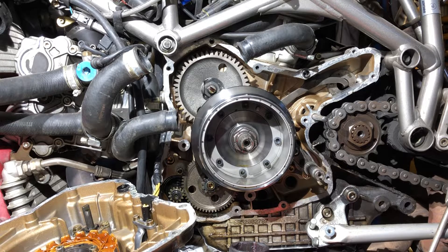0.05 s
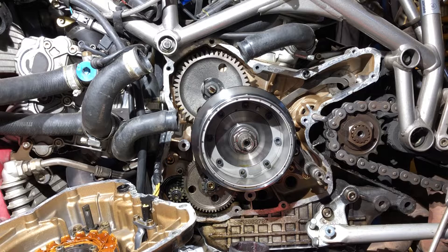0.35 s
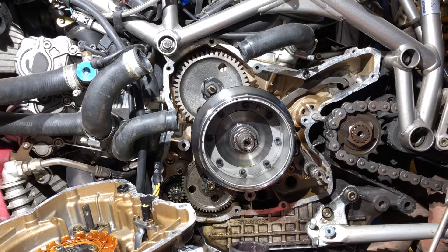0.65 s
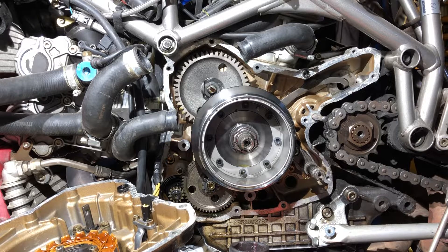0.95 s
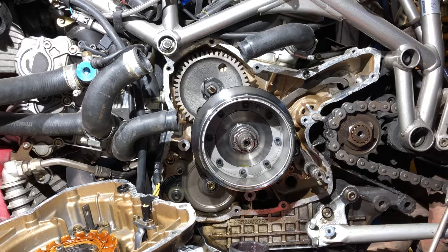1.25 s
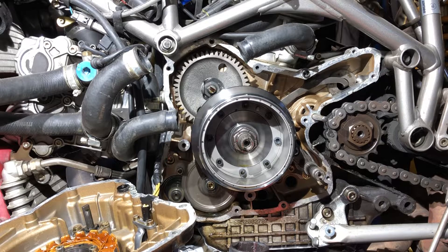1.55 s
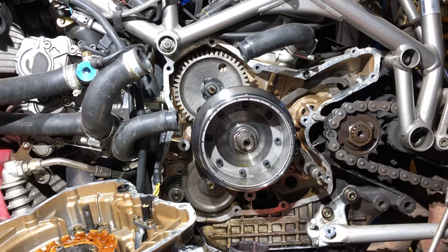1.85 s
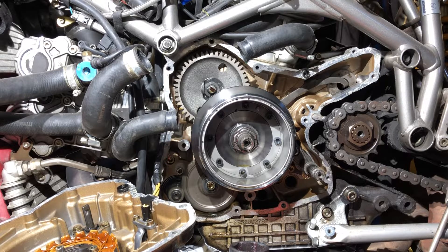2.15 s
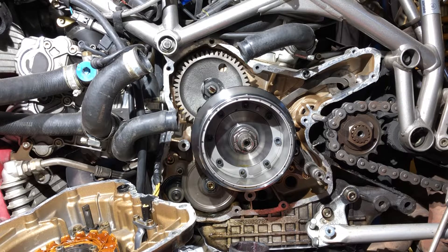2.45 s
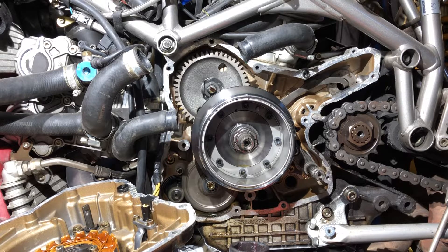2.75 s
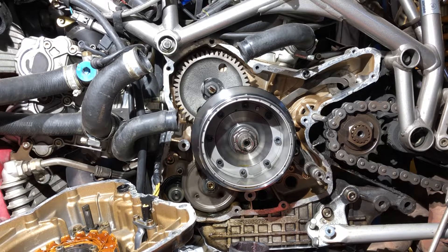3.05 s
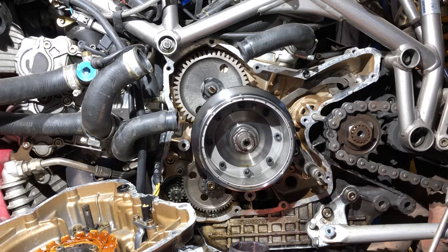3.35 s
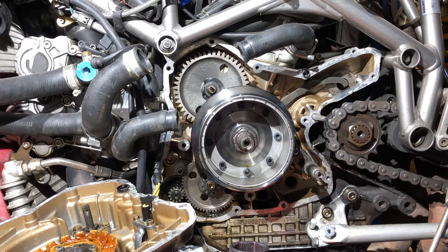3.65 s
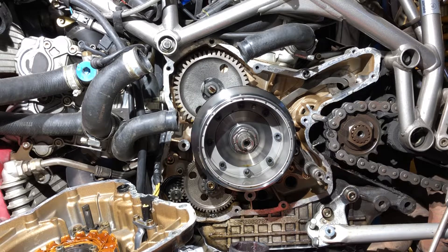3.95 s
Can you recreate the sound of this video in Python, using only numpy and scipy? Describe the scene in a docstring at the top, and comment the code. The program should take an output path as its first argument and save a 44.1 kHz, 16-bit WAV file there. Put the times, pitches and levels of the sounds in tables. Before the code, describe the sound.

A motorcycle starter motor kicks in with a clack, whirrs with grinding, rattling gears for a second, then coasts down and stops with a sharp metallic clunk. It is heard close up in a quiet workshop with a faint fan hum.

```python
"""A quiet workshop, a fan humming; mono. The starter motor of an opened motorcycle engine kicks in
with a clack, spins its reduction gears for a second and coasts down. Loose teeth rattle once a turn
and ring the steel wheels, the brushes hiss, the commutator whines. The train stops with a sharp
clunk that jolts the frame."""
import sys
import numpy as np
from scipy import signal
from scipy.fft import rfft, irfft, next_fast_len
from scipy.io import wavfile
from scipy.ndimage import uniform_filter1d, map_coordinates

SR = 44100
rng = np.random.default_rng(int(sys.argv[2]) if len(sys.argv) > 2 else 0)


def store_wav(level_fs):
    """Save 16-bit WAV to argv[1]."""
    pcm = np.round(np.clip(np.atleast_2d(level_fs), -1, 1) * 32767)
    wavfile.write(sys.argv[1], SR, pcm.T.astype(np.int16))


N = 176400
TIME_S = np.arange(N) / SR
HIT_TIME_S = np.arange(SR * 2 // 3) / SR
ON_S, STOP_S, FULL_SPEED_HZ = .98, 3.08, 139.3

# gear modes: pitch_hz, grinding_db, struck_db, t60_s
WHEEL_MODES = [(4339, 0, -4, .31), (4369, -5, 1, .14)]  # big wheel
IDLER_MODES = [(2585, -2, -11, .36), (2608, 0, -7, .14)]  # smaller gear
HIGH_MODES = [(3610, -7, -16, .2), (3745, -8, -18, .15), (6605, -14, -5, .32), (6675, -2, -4, .14),
              (6791, 0, -11, .2), (6980, 0, -16, .2), (11615, -3, -12, .12), (11693, 1, -16, .12)]  # upper modes of the steel gears
# tooth knock spectrum: freq_hz, gain_db
KNOCK_SPECTRUM = [(30, -67.5), (400, -14.5), (720, -14), (1050, -11), (1230, -1.5), (1520, -1), (1700, -7),
                  (2100, -26), (2700, -10.5), (5500, -45.5), (12000, -24)]


def amp(db):
    """Decibels to gain."""
    return 10 ** (np.asarray(db) / 20)


def unit(x):
    """Scale to rms 1."""
    return x / np.sqrt(np.mean(x ** 2) + 1e-20)


def along(points, hz):
    """Interpolate (freq_hz, value) points on a log frequency axis."""
    freq_hz, values = np.transpose(points)
    return np.interp(np.log(hz + 1), np.log(freq_hz + 1), values)


def curves(rows):
    """One value per sample for each column after the time."""
    time_s, *columns = np.transpose(rows)
    return [np.interp(TIME_S, time_s, column) for column in columns]


def wobble(rate_hz):
    """Smooth random curve with knots at rate_hz."""
    knots = rng.standard_normal(int(N * rate_hz / SR) + 4)
    return map_coordinates(knots, [TIME_S * rate_hz])


def colour(x, spectrum):
    """Minimum-phase filter shaped by (freq_hz, gain_db) points."""
    size = 2 * next_fast_len(len(x) // 2 + 4096)
    gain = amp(along(spectrum, np.fft.rfftfreq(size, 1 / SR)))
    cepstrum = irfft(np.log(gain), size)
    cepstrum[1:size // 2] *= 2
    cepstrum[size // 2 + 1:] = 0
    return irfft(rfft(x, size) * np.exp(rfft(cepstrum)), size)[:len(x)]


def noise(spectrum, size):
    """Coloured noise, rms 1."""
    return unit(colour(rng.standard_normal(size), spectrum))


def fade(t, t60_s):
    """Exponential decay."""
    return np.exp(-np.log(1000) * t / t60_s)


def steady(x):
    """Hold a pulse train's slow level near rms 1."""
    return x / np.sqrt(np.abs(uniform_filter1d(x * x, size=3500)) + np.mean(x * x) / 100)


def contacts(turns, per_turn, jitter_s, spread_db):
    """Pulses locked to the shaft, uneven in time and size."""
    at = np.interp(np.arange(1, turns[-1] * per_turn) / per_turn, turns, np.arange(N))
    late, size = rng.standard_normal((len(at), 2)).T
    at = np.clip(at + late * jitter_s * SR, 0, N - 1)
    return np.bincount(at.astype(int), amp(spread_db * np.clip(size, -2, 2)), N)


def struck(modes):
    """Free decay of (pitch_hz, gain_db, t60_s) modes, varied in level and phase."""
    t = HIT_TIME_S
    return sum(amp(db + rng.normal(0, 1.5)) * np.sin(2 * np.pi * (hz * t + rng.random()))
               * fade(t, t60_s) for hz, db, t60_s in modes)


def fan():
    """Unsteady fan tones swell slowly over a rush of air."""
    partials = [(419.2, -66), (558.9, -52.5), (629.5, -66.5), (838.5, -62.5), (1118, -72.5)]  # pitch_hz, level_db
    air_spectrum = [(20, -45.5), (35, -36), (53, -14.5), (80, -25.5), (115, -16.5), (200, -21.5),
                    (500, -23.5), (800, -17.5), (1200, -24), (2500, -34), (6000, -44.5), (11000, -51.5)]  # freq_hz, gain_db
    drifting_s = TIME_S + .00031 * wobble(3)
    tones = sum(amp(db + 1.2 * wobble(12)) * np.sin(2 * np.pi * (hz * drifting_s + rng.random()))
                for hz, db in partials)
    swell = amp(np.interp(TIME_S, [0, .6, 3.5], [-4, -.3, 1.2]))
    return np.sqrt(2) * tones * swell + amp(-58) * noise(air_spectrum, N)


def blows():
    """Gear slack closes at start and stop: teeth crack, the case thuds, the wheels ring."""
    hits = [(0.977, -24, -58, -39), (0.9784, -24.5, -22, -25.5), (2.9913, -37, -38, -50.5),
            (3.020, -35, -38, -32), (3.0262, -33, -21.5, -42), (3.0708, -31, -33.5, -21.5),
            (3.079, -14, -20, -26.5), (3.088, -28, -23.5, -33), (3.114, -40, -27, -54),
            (3.139, -42.5, -30.5, -66)]  # start_s, crack_db, case_db, ring_db
    # impact spectra: freq_hz, gain_db
    crack_spectrum = [(20, -42), (200, -18.5), (1000, 2), (1950, 7), (4000, 2), (5500, -0.5), (7500, -5.5),
                      (11000, 0), (15500, -7.5)]
    thud_spectrum = [(20, -50), (160, -18.5), (380, -2), (800, 1), (1350, 5.5), (2200, -20), (5000, -25.5),
                     (12000, -42)]
    # tooth-on-tooth and crankcase modes: pitch_hz, gain_db, t60_s
    clank_modes = [(1954, -3.5, .035), (3031, -16, .04), (4355, -5, .03), (5426, -5, .018)]
    case_modes = [(407, -7, 0.11), (1226, -2, 0.1), (1294, 4.5, 0.039), (1494, 2, 0.082), (1770, -4, 0.077)]
    gear_modes = [(hz, db, t60_s) for hz, _, db, t60_s in WHEEL_MODES + IDLER_MODES + HIGH_MODES]
    out, t = np.zeros(N + SR), HIT_TIME_S
    attack = 1 - np.exp(-t / .0011)
    crack_decay = amp(1.5) * fade(t, .012) + fade(t, .044) + amp(-24) * fade(t, .14)  # snap, body, tail
    for start_s, crack_db, case_db, ring_db in hits:
        crack = noise(crack_spectrum, len(t)) * crack_decay + struck(clank_modes)
        thud = amp(-2) * noise(thud_spectrum, len(t)) * fade(t, t60_s=.094)
        case = thud + amp(-9.5) * struck(case_modes)
        ring = amp(-8.5) * struck(gear_modes)
        blow = amp(crack_db) * crack + amp(case_db) * case + amp(ring_db) * ring
        out[round(start_s * SR):][:len(t)] += attack * blow
    return out[:N]


def rattle(speed_hz, turns):
    """Loose gears knock once a turn at speed; single teeth chatter and scrape in between."""
    chatter_spectrum = [(20, -77), (100, -32.5), (200, -21.5), (420, -13.5), (650, -10), (850, -4.5),
                        (1030, -9), (1230, 0), (1520, 4), (1650, -10.5), (2100, -20.5), (2700, -15),
                        (3150, -25.5), (3700, -13.5), (4000, -28.5), (4800, -16.5), (5400, -30.5),
                        (12000, -41.5)]  # freq_hz, gain_db
    knock_pulses = contacts(turns, per_turn=1, jitter_s=.00005, spread_db=3)
    knocks = steady(colour(knock_pulses, KNOCK_SPECTRUM))
    tooth_pulses = contacts(turns, per_turn=10, jitter_s=.00043, spread_db=3.6)
    scrape = fade(np.arange(SR // 20) / SR, t60_s=.046)
    pressure = signal.fftconvolve(tooth_pulses, scrape)[:N] * amp(1.33 * np.cos(2 * np.pi * turns))
    teeth = steady(colour(pressure * rng.standard_normal(N), chatter_spectrum))
    knock_share = np.clip(.6 * (speed_hz / FULL_SPEED_HZ) ** 3, 0, 1)
    return np.sqrt(knock_share) * knocks + np.sqrt(1 - knock_share) * teeth


def brushes(turns, bars):
    """Brushes scrape the commutator bars, harder once a turn; uneven contact flickers the hiss."""
    hiss_spectrum = [(20, -73.5), (300, -9), (2000, 1.5), (3200, -4.5), (3700, 1.5), (4050, -1.5),
                     (4850, -1.5), (5500, -6.5), (6300, -3.5), (6800, 3), (7600, -2), (8550, 5),
                     (9300, 0.5), (10050, 3.5), (10700, -0.5), (11600, 4.5), (12600, -2.5), (15500, 2)]  # freq_hz, gain_db
    bar_pulses = contacts(turns, per_turn=bars, jitter_s=.0002, spread_db=3.5)
    ticks = steady(colour(bar_pulses, hiss_spectrum))
    hiss = noise(hiss_spectrum, N)
    contact_db = .78 * np.cos(2 * np.pi * turns) + wobble(70)
    return (hiss + .57 * ticks) * amp(contact_db)


def ringing(modes, envelope):
    """Rubbing teeth keep steel modes singing, chattering in level and wavering in phase."""
    chatter = amp(1.7 * wobble(130))
    tones = np.zeros(N)
    for hz, grinding_db, _, _ in modes:
        gain = amp(grinding_db + 2.3 * wobble(45))
        waver_rad = .5 * wobble(35) + wobble(7)
        tones += gain * np.sin(2 * np.pi * hz * TIME_S + waver_rad)
    return amp(curves(envelope)[0]) * unit(chatter * tones)


def whine(speed_hz, turns, bars):
    """Shaft hum, clean commutator whine and rough mesh tones sweeping the casing's resonances."""
    # shaft and mesh tones: speed_multiple, gain_db
    shaft_orders = [(1, 0), (2, -.5), (3, -.5), (4, .5), (5, -1.5), (6, .5), (8, 3), (9, 1), (10, 1),
                    (11, 8)]
    mesh_orders = [(14, 0), (42, -2)]
    # shaft and commutator envelopes: time_s, level_db
    hum_envelope = [(1.08, -68), (1.2, -48.5), (1.31, -63), (1.332, -50), (1.542, -50), (2.146, -48.5),
                    (2.176, -52.5), (2.268, -48), (2.37, -61), (2.6, -78)]
    bar_envelope = [(1.15, -65), (1.19, -34), (1.22, -44), (1.45, -57), (1.58, -42.5), (1.85, -39),
                    (2.07, -39), (2.13, -52), (2.3, -56)]
    casing_response = [(600, -70), (950, -48), (1300, -39.5), (1700, -58), (2300, -59), (2850, -48),
                       (3250, -51), (3720, -40), (4000, -52), (4700, -44), (5500, -63)]  # freq_hz, gain_db
    phase = 2 * np.pi * turns + .015 * wobble(25)
    overtone_gain = (speed_hz / FULL_SPEED_HZ) ** 2.2
    shaft, mesh = np.zeros((2, N))
    for order, db in shaft_orders:
        gain = (overtone_gain if order > 1 else 1) * amp(db + 1.3 * wobble(12))
        shaft += gain * np.sin(order * (phase + .018 * wobble(60)) + rng.uniform(0, 2 * np.pi))
    commutator = amp(curves(bar_envelope)[0] + wobble(20)) * np.sin(bars * phase)
    for order, db in mesh_orders:
        gain = amp(along(casing_response, order * speed_hz) + db + 2.8 * wobble(40))
        rough_rad = 1.4 * wobble(170)
        mesh += gain * np.sin(order * phase + rough_rad)
    return np.sqrt(2) * (amp(curves(hum_envelope)[0]) * shaft + commutator + mesh)


def starter(bars=21):
    """The motor spins the gears up, runs and coasts to a stop."""
    motor_speed = [(.977, 5), (1.0, 45), (1.06, 86), (1.146, 112), (1.25, 127), (1.36, 132), (1.5, 137.6),
                   (1.7, 139), (2.08, 139.5), (2.2, 123), (2.3, 108), (2.44, 89), (2.58, 71), (2.8, 42),
                   (3.0, 20), (3.08, 3)]  # time_s, speed_hz
    effort = [(1.02, -30.5, -38.5), (1.1, -35, -35.5), (1.25, -32.5, -32), (1.34, -32.5, -31.5),
              (1.39, -27.5, -32), (1.5, -30, -30.5), (2.0, -29, -31), (2.07, -34.5, -29.5),
              (2.125, -30, -30.5), (2.28, -36, -36.5), (2.6, -39.5, -41), (2.75, -36, -46),
              (2.82, -38, -49.5), (2.89, -36.5, -49.5), (2.97, -37, -54), (3.06, -42.5, -65)]  # time_s, rattle_db, hiss_db
    # gear ringing envelopes: time_s, level_db
    wheel_envelope = [(1.0, -38.5), (1.08, -46.5), (1.27, -31), (1.36, -45), (1.51, -36), (1.55, -42.5),
                      (1.7, -34), (1.77, -45.5), (1.86, -30), (1.88, -39.5), (2.01, -35), (2.05, -42),
                      (2.11, -33.5), (2.16, -41), (2.44, -47), (2.46, -40), (2.56, -52), (3.0, -62)]
    high_envelope = [(1.15, -46), (1.8, -38.5), (2.08, -36.5), (2.17, -48.5), (3.0, -69.5)]
    idler_envelope = [(1.0, -39.5), (1.1, -45.5), (1.28, -33.5), (1.32, -44), (1.37, -39), (1.73, -34.5),
                      (1.94, -43), (1.97, -28.5), (2.0, -41), (2.38, -45), (2.96, -59.5)]
    speed_hz, = curves(motor_speed)
    turns = np.cumsum(speed_hz) / SR
    rattle_db, hiss_db = curves(effort)
    running = np.clip((TIME_S - ON_S) / .004, 0, 1) * np.clip((STOP_S - TIME_S) / .013, 0, 1)
    grind = amp(rattle_db) * rattle(speed_hz, turns) + amp(hiss_db) * brushes(turns, bars)
    ring = (ringing(WHEEL_MODES, wheel_envelope) + ringing(HIGH_MODES, high_envelope)
            + ringing(IDLER_MODES, idler_envelope))
    return running * (grind + ring + whine(speed_hz, turns, bars))


def tooth_catches():
    """Teeth catch hard while grinding, one short knock each."""
    catches = [(1.296, -22.5), (1.319, -27), (1.364, -23), (1.972, -24.5), (2.131, -23)]  # start_s, level_db
    out, t = np.zeros(N + SR), HIT_TIME_S
    for start_s, db in catches:
        knock = noise(KNOCK_SPECTRUM, len(t)) * fade(t, t60_s=.052)
        out[round(start_s * SR):][:len(t)] += amp(db) * knock
    return out[:N]


def frame_jolt(rise_s=.0075):
    """The stop jolts the frame's low modes."""
    frame_modes = [(129.7, -40.5, .3), (245, -37.5, 0.085), (337.5, -31.5, 0.092), (752, -26.5, 0.14),
                   (852, -24, 0.15)]  # pitch_hz, level_db, t60_s
    out, t = np.zeros(N + SR), HIT_TIME_S
    out[round(STOP_S * SR):][:len(t)] = struck(frame_modes) * (1 - np.exp(-t / rise_s))
    return out[:N]


def workshop(x):
    """Short room tail, dying faster in the treble."""
    decay_times = [(150, 0.76), (1000, 0.4), (5000, 0.34), (13000, 0.19)]  # freq_hz, t60_s
    hz, t, bands = signal.stft(rng.standard_normal(SR // 2), SR, nperseg=256)
    _, tail = signal.istft(bands * fade(t, along(decay_times, hz)[:, None]), SR, nperseg=256)
    response = np.pad(tail / np.linalg.norm(tail), (SR // 200, 0))  # 5 ms pre-delay
    return signal.fftconvolve(x, response)[:N]


def scene():
    """Engine close by, room and fan behind it."""
    engine = starter() + blows() + tooth_catches() + frame_jolt()
    mono = engine + amp(-10.5) * workshop(engine) + fan()
    return np.array([mono, mono])


def record(dry):
    """Brick-wall low-pass."""
    cutoff_hz = 15850
    size = next_fast_len(N + SR // 2)
    passband = np.fft.rfftfreq(size, 1 / SR) < cutoff_hz
    return irfft(rfft(dry, size) * passband, size)[:, :N]


dry = scene()
out = record(dry)
store_wav(out)
```